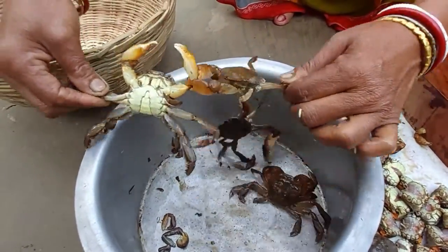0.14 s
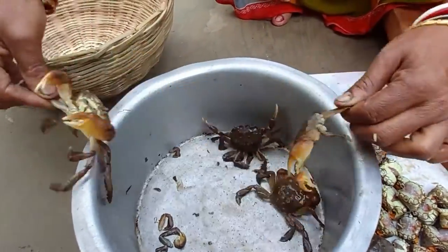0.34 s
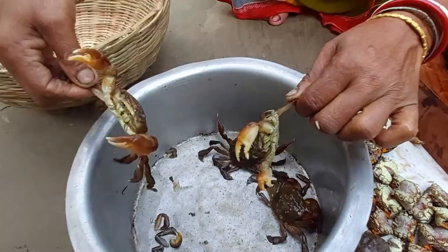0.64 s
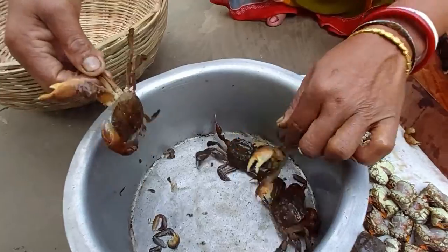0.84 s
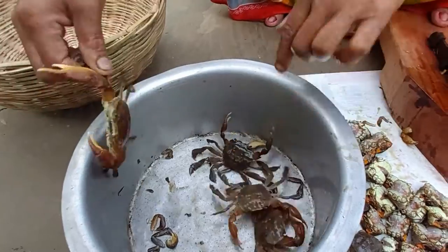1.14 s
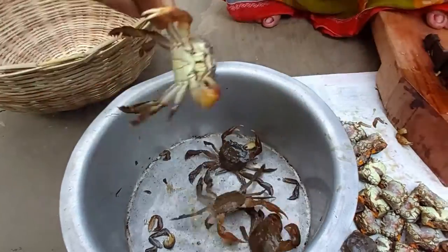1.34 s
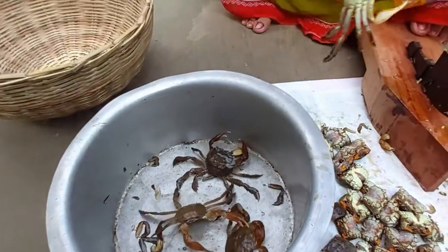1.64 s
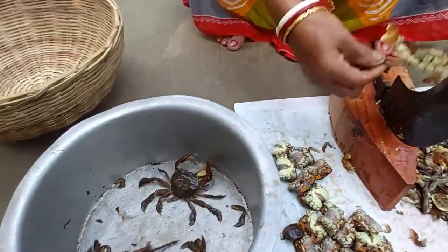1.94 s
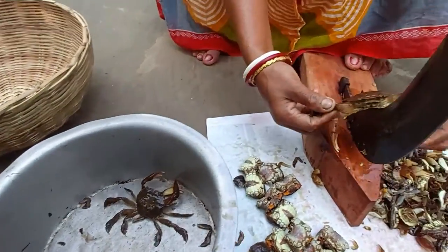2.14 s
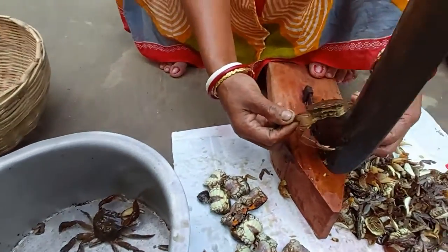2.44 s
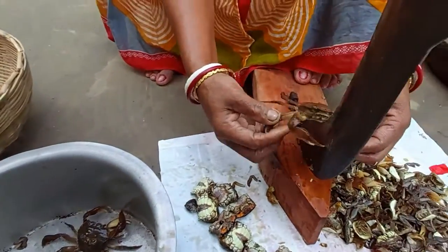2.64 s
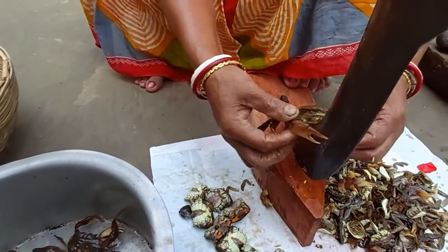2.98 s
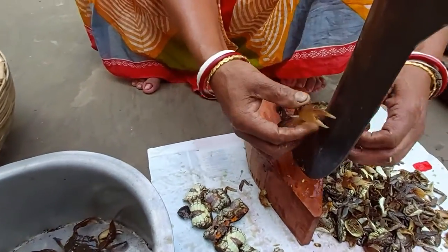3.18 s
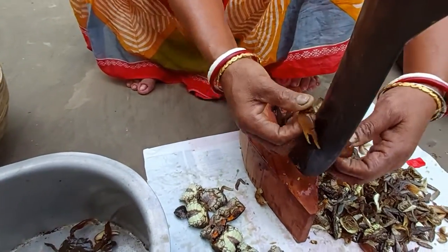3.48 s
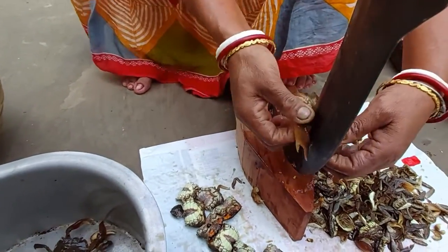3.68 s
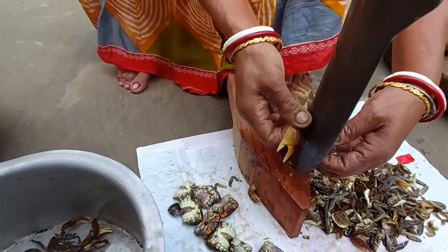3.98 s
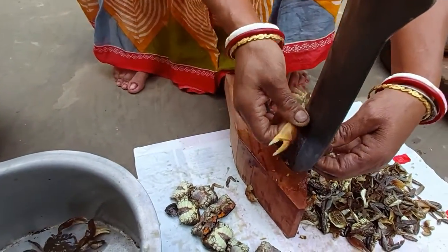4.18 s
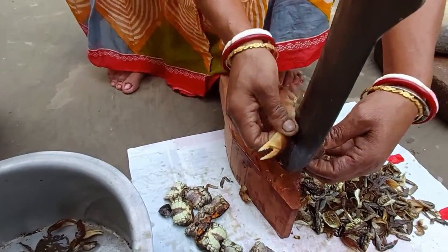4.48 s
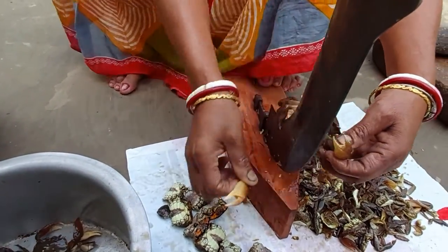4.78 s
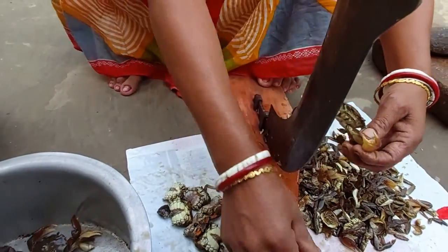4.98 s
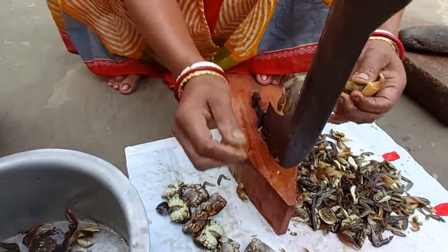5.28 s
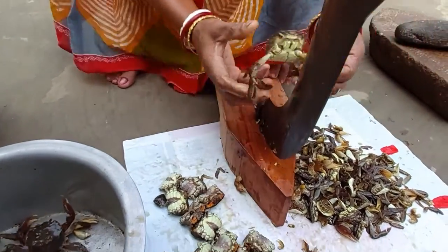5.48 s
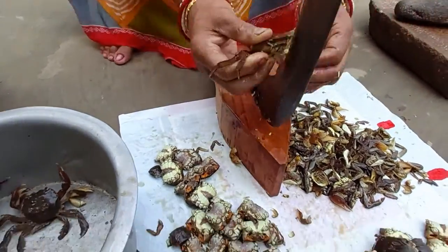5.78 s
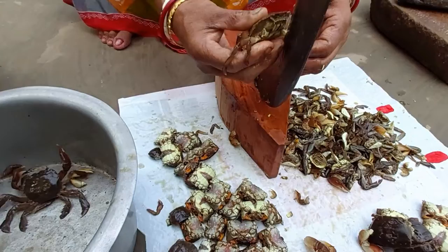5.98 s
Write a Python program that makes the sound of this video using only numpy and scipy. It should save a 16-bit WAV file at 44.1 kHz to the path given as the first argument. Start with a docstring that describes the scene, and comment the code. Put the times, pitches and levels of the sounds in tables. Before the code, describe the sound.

Close, dry crunches and sharp clicks of small crabs being broken, over legs scratching a ringing metal basin and low wind buffets outdoors.

```python
"""A breezy yard: small crabs scrabble in a thin metal pot; another is snapped and cut on a blade in a wooden block.
Cracks are bursts of random fractures that ring shell pieces; legs are stuttered grit and tiny ringing bits.
Knocks and pot are struck decaying modes, the pot also rubbed unevenly by the legs.
Breeze is low noise on the phone's two ports, mostly the right; yard is faint smooth hiss."""
import sys
import numpy as np
from scipy import signal
from scipy.fft import rfft, irfft
from scipy.io import wavfile
from scipy.ndimage import uniform_filter1d, map_coordinates

SR = 44100
rng = np.random.default_rng(int(sys.argv[2]) if len(sys.argv) > 2 else 0)


def transcribe(u):
    """Save the signal u as a 16-bit wav file named by the first command-line argument.

    u: samples, shape (n,) or (channels, n), limited to [-1, 1]; the rate is SR.
    q: integer samples, one column per channel.
    """
    v = np.clip(np.atleast_2d(u).T, -1, 1)
    q = np.round(v * 32767).astype(np.int16)
    wavfile.write(sys.argv[1], SR, q)


N = 269892

# shell cracks and claw clicks: start_s, level_db, brightness_db (treble over body), base_t60_s, piece_hz
CRACK_EVENTS = [(0.0248, -22.5, -10, 0.037, 6300), (.103, -33, -9, 0.056, 7050),
                (0.136, -34, -7, 0.072, 6690), (0.1585, -27, -5, 0.043, 6650),
                (0.1744, -19, -4.5, 0.072, 6800), (.196, -40, 10, 0.035, 7200),
                (0.2045, -30, -4, 0.092, 2150), (0.236, -40.5, 9.5, 0.086, 6520),
                (0.2477, -21.5, -1.5, 0.066, 7200), (0.27, -28, -2.5, 0.094, 1820),
                (0.288, -24, -6, 0.097, 1900), (0.3136, -17.5, -5, 0.036, 7180),
                (0.341, -30.5, -2, 0.034, 2230), (0.444, -47, 0, 0.07, 1890), (.62, -31, -18, 0.13, 2220),
                (0.791, -33.5, 5, 0.028, 6770), (0.825, -35, -3.5, 0.028, 1930),
                (0.918, -55.5, 16.5, 0.032, 5700), (0.9266, -27, -34, 0.03, 1920),
                (0.9752, -27.5, 1, 0.082, 2320), (1.0216, -27, -7, 0.13, 2205), (1.05, -29, -25, .05, 2200),
                (1.075, -33, -25, 0.2, 2000), (1.112, -26.5, -12, 0.035, 1860),
                (1.128, -43.5, 0.5, 0.31, 7220), (1.178, -42, -9, 0.14, 2180),
                (1.2187, -37.5, -0.5, 0.17, 6630), (1.2397, -30, -19, 0.057, 2050),
                (1.267, -36, -28, 0.099, 1770), (1.3111, -32, -12, 0.043, 2090),
                (1.322, -40, -1, 0.052, 7160), (1.3863, -33.5, -10, 0.036, 2040),
                (1.427, -30.5, -16, 0.051, 2270), (1.449, -32, -13, 0.11, 2045),
                (1.467, -36, -15, 0.13, 2004), (1.5154, -26.5, -6, 0.035, 1970),
                (1.546, -33, -37, 0.11, 1875), (1.572, -36, -24, 0.037, 1970),
                (1.6031, -30.5, -9, 0.042, 1990), (1.6432, -35, -13, 0.046, 1900),
                (1.726, -35, -26, 0.097, 1990), (1.75, -42, -7, 0.072, 2080), (1.774, -38, -10, 0.19, 1630),
                (1.8, -31, -10, 0.025, 1640), (1.8268, -46, -17, 0.028, 1820), (1.845, -41, -8, .05, 1980),
                (1.865, -42, 0, 0.032, 5100), (1.886, -39, -21, 0.04, 2000),
                (1.903, -43.5, 0.5, 0.11, 2070), (1.9253, -31.5, -12, 0.21, 2120),
                (1.965, -39, 0, 0.18, 6870), (1.981, -18, -15.5, 0.036, 7750),
                (2.012, -32.5, 0, 0.053, 4200), (2.0584, -23, -9.5, 0.07, 1660),
                (2.0679, -14.5, -9, 0.042, 1850), (2.076, -28.5, -28, 0.12, 2594),
                (2.162, -38.5, -5.5, 0.15, 3960), (2.298, -44.5, -24, 0.098, 2050),
                (2.329, -50, -1.5, 0.16, 6600), (2.406, -54, 8.5, .03, 7800),
                (2.418, -42.5, -5, 0.17, 2290), (2.492, -43.5, -2, 0.27, 2470),
                (2.5066, -28.5, -4.5, 0.065, 3930), (2.595, -41.5, -5.5, 0.13, 1670),
                (2.6858, -54.5, 1.5, 0.23, 7040), (2.7096, -40, -9, 0.22, 2226),
                (2.812, -45, -6.5, 0.19, 1990), (2.8676, -28, -2.5, 0.096, 2265),
                (2.9038, -33, -2.5, 0.041, 3780), (3.004, -19.5, -11, 0.052, 2570),
                (3.036, -32, -6, 0.12, 1770), (3.05, -33.5, -2, 0.16, 3660),
                (3.0617, -18, -10, 0.043, 2560), (3.258, -28, -15.5, 0.11, 5740),
                (3.328, -24.5, -13.5, 0.068, 1910), (3.4392, -33.5, -14.5, 0.058, 1520),
                (3.514, -40, -4.5, 0.098, 6770), (3.55, -42.5, 2.5, 0.059, 3830),
                (3.5683, -36.5, -9, 0.098, 1644), (3.597, -39.5, -8, 0.092, 2130),
                (3.678, -33, -9, 0.083, 5300), (3.693, -30, -6, 0.15, 2220),
                (3.753, -36.5, -2.5, 0.085, 2440), (3.7933, -41, -2, 0.21, 7000),
                (3.802, -37, -22, 0.087, 2310), (3.8598, -42, -1.5, 0.052, 2050),
                (3.904, -46, 1, 0.028, 4500), (3.939, -35, -14, 0.51, 5560),
                (4.0345, -18, -8.5, 0.073, 2600), (4.1023, -18.5, -6, 0.034, 5160),
                (4.123, -40.5, 0, 0.045, 3700), (4.2663, -41, -3.5, 0.047, 6600),
                (4.2973, -30, -3, 0.082, 2330), (4.416, -38.5, -5, 0.045, 1560),
                (4.4473, -46.5, 1, 0.033, 6600), (4.4722, -50, 11, 0.015, 7500),
                (4.4821, -37.5, 8, 0.044, 7670), (4.494, -45.5, 7, 0.11, 6180),
                (4.568, -44, -6, 0.068, 2630), (4.654, -34, -14, .05, 2400),
                (4.6613, -22, -11, 0.057, 2430), (4.6774, -31.5, -1.5, 0.056, 2540),
                (4.704, -36.5, -7, 0.11, 1547), (4.804, -48, 3, 0.039, 6800),
                (4.866, -43.5, -11, 0.11, 1760), (4.8962, -42.5, -8.5, 0.14, 1640),
                (4.969, -44.5, -10, 0.036, 2670), (5.0438, -39, -10, 0.05, 1600),
                (5.078, -28.5, -4.5, 0.018, 7860), (5.287, -42, -2, 0.083, 6500),
                (5.329, -43, -9.5, 0.2, 1760), (5.3875, -30.5, -14, 0.051, 2020),
                (5.501, -47.5, -7, 0.3, 2200), (5.542, -40, -6.5, 0.05, 7210),
                (5.6232, -35, -4, 0.11, 6950), (5.804, -55.5, 3.5, 0.21, 6400),
                (5.832, -46.5, -7.5, 0.094, 2170)]
# crack in five shell bands, low to high: band_db, brightness_share, small_piece_share, t60_multiple
CRACK_BAND_MIX = [(-24, 0.041, -0.2, 1.1), (-14.5, 0, -0.85, 1.2), (-15.5, 2.03, -3.5, .95),
                  (-8, 0.95, 0.5, .9), (-8, 1.32, 0.27, .7)]
# edges of the five shell bands: edge_hz
BAND_EDGES_HZ = (300, 1400, 3200, 5400, 8500, 18000)
# split modes of one ringing piece: frequency_ratio
PIECE_MODE_RATIOS = (.97, 1, 1.045)
# colour of shell in the pot as the phone hears it: frequency_hz, relative_density_db
SHELL_COLOUR = [(180, -87), (300, -32), (398, 6.5), (762, -11.5), (885, -1), (1320, -11.5), (1640, -6.5),
                (2100, -6), (2680, -9.5), (3080, -16), (3760, -8.5), (4990, -12.5), (6850, -5), (8640, -16),
                (12700, -15.5), (15300, -15.5), (16300, -44)]
# legs dragging on metal, fingers on shell: time_s, level_db, brightness_db (treble over body)
SCRATCH_LEVELS = [(0, -70.5, 21.5), (.16, -48.5, -1.5), (.31, -44, -2), (.45, -53, -6.5), (.56, -45.5, -1),
                  (.66, -49.5, -2), (.72, -78, -3), (.79, -56, 0.5), (1.08, -50.5, 4), (1.3, -50, -3),
                  (1.4, -51.5, -6.5), (1.67, -50, -6), (1.95, -47.5, -13), (2.3, -57.5, 2.5),
                  (2.62, -62.5, -18), (3.02, -47.5, 5.5), (3.15, -57, 0), (3.3, -55, 6), (3.39, -44.5, -11),
                  (3.5, -57, -1), (3.65, -56, -3.5), (3.94, -60.5, 5), (4.4, -54, -6.5), (4.55, -53, 0),
                  (4.65, -43.5, -1), (4.74, -55.5, -2), (4.85, -57.5, -3), (5.1, -64, 3), (6.12, -62, 0)]
# scratch in the three upper shell bands: band_db
SCRATCH_UPPER_DB = (-4, -14, 1)
# dull knocks of block and pot floor: start_s, peak_db, base_hz, base_t60_s
KNOCK_EVENTS = [(0.028, -43.5, 420, 0.058), (0.205, -29.5, 525, 0.076), (0.237, -23, 458, 0.053),
                (0.927, -26.5, 445, 0.073), (1.028, -31, 890, 0.069), (1.275, -38.5, 490, 0.057),
                (1.447, -35, 960, 0.03), (1.481, -32.5, 460, 0.053), (1.517, -42.5, 505, 0.31),
                (1.776, -37, 984, 0.056), (1.927, -27, 457, 0.054), (2.01, -34.5, 590, 0.022),
                (2.0685, -23, 1042, 0.058), (2.307, -42.5, 445, 0.083), (2.701, -45.5, 582, 0.18),
                (3.039, -26.5, 426, 0.061), (3.072, -27.5, 443, 0.076), (3.345, -45.5, 1040, 0.22),
                (3.568, -41.5, 984, 0.078), (3.441, -39.5, 610, 0.058), (3.589, -43.5, 410, 0.067),
                (4.066, -30, 448, 0.094), (4.332, -37.5, 457, 0.11), (4.473, -48, 1400, 0.026),
                (4.494, -39, 1230, 0.041), (4.574, -39, 480, 0.065), (4.661, -36, 474, 0.056),
                (4.701, -30.5, 450, 0.053), (4.713, -34.5, 473, 0.085)]
# bumps through floor and hand: start_s, peak_db, base_hz, base_t60_s, left_minus_right_db
THUMP_EVENTS = [(0.237, -36, 190, 0.028, -13), (4.482, -43, 77, 0.13, 13)]
# claws tapping the pot wall, the first two rows a crab dropping into the pot: start_s, blow_db, low_modes_db,
# high_modes_db
POT_HITS = [(0.24, -44.5, 25, 1), (0.318, -43, 16.5, 0), (0.82, -55, -14, -2), (0.976, -45.5, -24, 3),
            (2.07, -63, -11, 7), (2.514, -51, -21, 7.5), (2.705, -69, 3, 12), (2.868, -47, 2, 9),
            (3.004, -44, -6, 8), (3.061, -41, -2, -8), (3.329, -62, -14, -6), (3.694, -47.5, -5, 3),
            (3.862, -56, 6, 6), (4.036, -56, -8, 11), (4.097, -57, -6, 9), (4.301, -42.5, -30, 0.5),
            (4.723, -56.5, 5, 5.5), (5.332, -58, 6, 3), (5.552, -59.5, -1, -10), (5.629, -56, -3, 4.5),
            (5.951, -52, -6, -18)]
# pot wall modes: mode_hz, mode_db, t60_s
POT_MODES = [(394.3, -19.5, 0.73), (497, -12.5, 0.075), (870, -8.5, 0.79), (1049, -5.5, 0.13),
             (1700, -22, 0.2), (1774, -19, 0.48), (1830, -7.5, 0.39), (2185, -0.5, 0.26), (2253, -6.5, 0.3),
             (2450, -6.5, 0.27), (2590, -8.5, 0.3)]
# phone turning from pot to blade: time_s, left_lead_samples, left_minus_right_db
PHONE_AIM = [(0, 6.5, -3.5), (.5, -7, -5), (1.5, 4, -3.5), (2.6, 10, -3), (4, 14.5, -2.5), (6.12, 13, -3.5)]
# breeze on the exposed right port: time_s, level_db
RIGHT_BREEZE = [(0, -53.5), (1.3, -54), (2.1, -46.5), (2.7, -51.5), (3.5, -41.5), (4.2, -51), (5, -56),
                (6.12, -51.5)]
# breeze colour: frequency_hz, relative_density_db
GUST_COLOUR = [(12, -42), (20, -37), (45, -2.5), (70, 8), (148, -5), (259, -20), (317, -41), (340, -23),
               (440, -91), (750, -120)]
# single buffets on the right port: centre_s, level_db, length_s
BUFFET_EVENTS = [(1.422, -40.5, 0.042), (1.547, -38, 0.066), (1.847, -21.5, 0.028), (1.915, -30, 0.086),
                 (2.017, -28, 0.063), (2.228, -37, 0.085), (2.318, -40.5, 0.019), (2.927, -26, 0.055),
                 (3.113, -25.5, .053), (3.192, -32, 0.043), (3.286, -30.5, 0.044), (3.359, -31.5, 0.13),
                 (3.55, -39, 0.029), (3.67, -39, 0.016), (3.755, -42, 0.045), (6.07, -43, 0.038)]
# yard hiss colour: frequency_hz, relative_density_db
YARD_COLOUR = [(250, -5), (450, -8), (1200, -11), (3000, -12.5), (7000, -17), (15600, -24.5), (16200, -50)]

CRACK_ATTACK_S, BREAK_RISE_S = 0.0015, 0.00076
CRACK_TAIL_DB, CRACK_TAIL_T60_S = -21, 0.27
PIECE_DB, PIECE_T60_MULTIPLE, CLICK_DB = -3.5, 1.46, -17.5
SHARD_LO_HZ, SHARD_HI_HZ, SHARD_DB, SHARD_T60_MULTIPLE = 3530, 8340, -16, 1
TREBLE_LEFT_MINUS_RIGHT_DB = 4  # top two shell bands
BOOM_START_DB, BOOM_LATE_DB, BOOM_FADE_S = 7.5, -3, 1  # lowest scratch band
SLIP_SCATTER_DB, SLIP_COLOUR_DB = 3, 5
RUB_DB, LOW_MODES_BELOW_HZ, HIGH_MODES_ABOVE_HZ = -48, 600, 950
LEE_DB, YARD_DB = -55, -64.5  # breeze on the sheltered left port; yard hiss
CEILING, TOP_HZ = .24, 16700


def cracks():
    """Sudden fracture bursts ring a shell piece and its shards; decay varies by band over a weak tail."""
    t = np.arange(SR // 4) / SR
    power = np.zeros((5, N + SR))
    rings, clicks = np.zeros((3, N + SR)), np.zeros((3, N + SR))
    jolts = rng.standard_normal((len(CRACK_EVENTS), 3, 400))
    shards_hz = SHARD_LO_HZ * (SHARD_HI_HZ / SHARD_LO_HZ) ** rng.random((len(CRACK_EVENTS), 6))
    break_shape = t[:400] / BREAK_RISE_S * np.exp(-t[:400] / BREAK_RISE_S)
    attack = np.minimum(t / CRACK_ATTACK_S, 1)
    tail = undb(CRACK_TAIL_DB) * 1000 ** (-t / CRACK_TAIL_T60_S)

    for (s, db, bright_db, t60, hz), jolt, pitches in zip(CRACK_EVENTS, jolts, shards_hz):
        i, t60 = int(s * SR), max(t60, .01)
        span = slice(i, i + len(t))
        small_db = 3 * np.tanh(4.1 * np.log2(hz / 4800))  # small, high-pitched pieces crack brighter
        for k, (band_db, bright, small, slow) in enumerate(CRACK_BAND_MIX):
            level_db = db + band_db + bright * bright_db + small * small_db
            fall = 1000 ** (-t / (t60 * slow)) + tail
            power[k, span] += (undb(level_db) * fall * attack) ** 2

        push = np.pad(jolt * break_shape, ((0, 0), (0, len(t) - 400)))
        clicks[:, i:i + 400] += undb(db + CLICK_DB) * push[:, :400]
        piece = sum(crest(ring(push, r * hz, PIECE_T60_MULTIPLE * t60)) for r in PIECE_MODE_RATIOS)
        piece_db = db + PIECE_DB + bright_db * (hz > BAND_EDGES_HZ[2])
        rings[:, span] += undb(piece_db) * crest(piece)
        shards = sum(crest(ring(push, f, SHARD_T60_MULTIPLE * t60)) for f in pitches)
        rings[:, span] += undb(db + SHARD_DB + bright_db) * shards

    parts = bands(grit(7000., 0.73, 0.7), (0.94, 0.19, 0.074, 0.028, 0.035))
    bursts = sum(np.sqrt(p[:N]) * part for p, part in zip(power, parts))
    dry_clicks = clicks[:, :N].std() * colour(clicks[:, :N], SHELL_COLOUR, 1800, 3900)
    return pan(curve(PHONE_AIM)[1]) * (bursts + ports(rings[:, :N] + dry_clicks, 0.29))


def scratch():
    """Leg tips slip and stutter on metal amid tiny ringing bits; the low boom under the legs fades."""
    db, bright_db = curve(SCRATCH_LEVELS)
    fade = np.exp(-np.arange(N) / SR / BOOM_FADE_S)
    boom_db = BOOM_LATE_DB + (BOOM_START_DB - BOOM_LATE_DB) * fade
    levels_db = [db + boom_db, db, *(db + bright_db + band_db for band_db in SCRATCH_UPPER_DB)]
    parts = bands(grit(1500., 3.2, 1.0), (0.5, 0.35, 0.04, 0.04, 0.025))
    stutter = slips(130., SLIP_SCATTER_DB, 0.0056)
    hiss = sum(undb(level_db) * on * part for level_db, on, part in zip(levels_db, stutter, parts))
    low_bits = undb(db - 9.0) * chips(1551.0, 2669.0, 0.095, 200.)
    high_bits = undb(db + bright_db - 7.5) * chips(5567.0, 8200., 0.048, 500.0)
    return pan(curve(PHONE_AIM)[1]) * (hiss + low_bits + high_bits)


def slips(rate_hz, scatter_db, fade_s):
    """Five gain tracks of short slips at shared random moments, each slip with its own colour."""
    at = rng.random(N) < rate_hz / SR
    scatter = scatter_db * np.minimum(rng.exponential(1, N), 2.5)
    size = undb(scatter + SLIP_COLOUR_DB * rng.standard_normal((5, N)))
    fade = np.exp(-1 / (fade_s * SR))
    power = signal.lfilter([1], [1, -2 * fade, fade ** 2], at * size ** 2)
    return np.sqrt(0.02 + 0.16 * power / power.mean(axis=1, keepdims=True))


def chips(lo_hz, hi_hz, t60_s, rate_hz, count=24):
    """Loose shell bits and leg tips, each a decaying mode flicked at random moments; rms 1."""
    pitches_hz = lo_hz * (hi_hz / lo_hz) ** rng.random(count)
    out = 0
    for hz in pitches_hz:
        flicks = (rng.random(N) < rate_hz / count / SR) * rng.standard_normal((3, N))
        out = out + ring(flicks, hz, t60_s)
    return unit(ports(out, 0.076))


def knocks():
    """A soft few-millisecond push rings a damped group of low modes."""
    out, t = np.zeros((2, N + SR)), np.arange(SR // 4) / SR
    rows = [(*k, -1.5) for k in KNOCK_EVENTS] + THUMP_EVENTS
    shared = rng.standard_normal((len(rows), 1, 301))
    jolts = shared + 0.84 * rng.standard_normal((len(rows), 2, 301))  # ports differ a good deal
    shape = t[:301] * np.exp(-t[:301] / 0.0016)
    for (s, db, hz, t60, pan_db), jolt in zip(rows, jolts):
        push = np.pad(np.diff(jolt * shape), ((0, 0), (0, len(t) - 300)))
        body = crest(ring(push, hz, t60))
        body = body + 0.52 * crest(ring(push, 1.1 * hz, t60))
        body = body + 0.6 * crest(ring(push, 1.5 * hz, 1.3 * t60))
        i = int(s * SR)
        out[:, i:i + len(t)] += pan(pan_db)[:, None] * undb(db) * crest(body)
    return out[:, :N]


def pot(rubbing):
    """Taps and stuttering, uneven rubbing ring the wall modes; each tap lands on a new spot of every mode."""
    out = 0
    s, blow_db, low_db, high_db = np.transpose(POT_HITS)
    spot = rng.standard_normal((len(POT_HITS), len(POT_MODES)))
    side = rng.standard_normal((len(POT_MODES), 2))
    for k, (hz, db, t60) in enumerate(POT_MODES):
        weight_db = low_db * (hz < LOW_MODES_BELOW_HZ) + high_db * (hz > HIGH_MODES_ABOVE_HZ)
        blows = undb(RUB_DB) * rubbing
        blows[(s * SR).astype(int)] += undb(blow_db + weight_db + 2.2 * spot[:, k])
        out = out + undb(db + 0.82 * side[k])[:, None] * ring(blows, hz, t60)
    return ports(np.array([out[0], *out]), 0.88)


def wind():
    """Unrelated turbulence on each port; right-port buffets are even-sized swirls reaching higher in pitch."""
    t = np.arange(N) / SR
    air = colour(rng.standard_normal((2, N)), GUST_COLOUR)
    air = unit(air / uniform_filter1d(air ** 2, size=4000) ** .3)  # evens the swells
    breeze = undb(np.array([np.full(N, LEE_DB), curve(RIGHT_BREEZE)[0]])) * air
    swirl = colour(rng.standard_normal(N), GUST_COLOUR, 30)
    swirl = swirl + .5 * colour(rng.standard_normal(N), GUST_COLOUR, 77)
    swirl = unit(swirl / np.sqrt(uniform_filter1d(swirl ** 2, size=1500)))
    push = sum(undb(db) * np.exp(-(2 * (t - s) / length) ** 2) for s, db, length in BUFFET_EVENTS)
    return breeze + np.array([[0], [1]]) * push * swirl


def yard():
    """Smooth distant hiss: coloured noise of like level at both ports, mostly scattered."""
    return undb(YARD_DB) * ports(colour(rng.standard_normal((3, N)), YARD_COLOUR, 136), 0.17)


def undb(db):
    """Decibels to amplitude."""
    return 10 ** (np.asarray(db) / 20)


def unit(x):
    """Scale to rms 1."""
    return x / np.sqrt(np.mean(x ** 2))


def crest(x):
    """Scale each row to peak 1."""
    return x / np.abs(x).max(axis=-1, keepdims=True)


def curve(table):
    """Columns of a table led by time_s, one value per sample."""
    s, *columns = np.transpose(table)
    return np.array([np.interp(np.arange(N) / SR, s, c) for c in columns])


def colour(x, spectrum, lo_hz=15, hi_hz=20000):
    """Shape x by a frequency_hz, db table between two soft edges; rms 1."""
    hz = np.maximum(np.arange(N // 2 + 1) * SR / N, 1)
    points_hz, db = np.transpose(spectrum)
    edges = 1 / np.sqrt((1 + (lo_hz / hz) ** 8) * (1 + (hz / hi_hz) ** 8))
    gain = undb(np.interp(np.log(hz), np.log(points_hz), db))
    return unit(irfft(rfft(x) * gain * edges, N))


def pan(db):
    """Left and right gains for a left-minus-right difference in dB."""
    return undb(np.array([db, -np.asarray(db)]) / 2)


def ports(shared, alike):
    """One wave reaching both ports with a lag, mixed with scattered sound that differs at each."""
    t, lead = np.arange(N), curve(PHONE_AIM)[0]
    late = map_coordinates(shared[0], [t - lead], order=3, mode="nearest")
    alike = np.clip(alike, 0, 1)
    return np.sqrt(alike) * np.array([shared[0], late]) + np.sqrt(1 - alike) * shared[1:]


def grit(rate_hz, scatter_db, hiss):
    """Three rows of tiny fractures, random in time and size, over smooth noise."""
    hit = rng.random((3, N)) < rate_hz / SR
    size = undb(scatter_db * np.minimum(rng.exponential(1, (3, N)), 4)) * rng.standard_normal((3, N))
    return unit(hit * size) + hiss * rng.standard_normal((3, N))


def bands(x, alike):
    """Split fractures into five shell-coloured bands; the ports agree less in the treble."""
    parts = []
    for lo, hi, a in zip(BAND_EDGES_HZ, BAND_EDGES_HZ[1:], alike):
        gains = pan(TREBLE_LEFT_MINUS_RIGHT_DB * (lo > BAND_EDGES_HZ[2]))
        parts.append(unit(ports(colour(x, SHELL_COLOUR, lo, hi), a)) * gains[:, None])
    return parts


def ring(x, hz, t60_s):
    """One decaying mode; a unit blow rings at height about 1."""
    r, w = np.exp(-np.log(1000) / (t60_s * SR)), 2 * np.pi * hz / SR
    return signal.lfilter([0, r * np.sin(w)], [1, -2 * r * np.cos(w), r * r], x)


def scene():
    """Sum of all sources; the legs also rub the pot."""
    legs = scratch()
    return cracks() + legs + knocks() + pot(legs[0]) + wind() + yard()


def record(dry):
    """The phone rounds the loudest peaks and cuts the top."""
    rounded = CEILING * np.tanh(dry / CEILING)
    return signal.sosfilt(signal.ellip(10, .2, 80, TOP_HZ, fs=SR, output="sos"), rounded)


dry = scene()
out = record(dry)
transcribe(out)
```